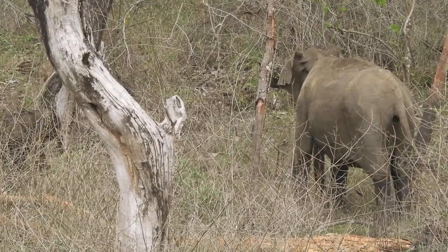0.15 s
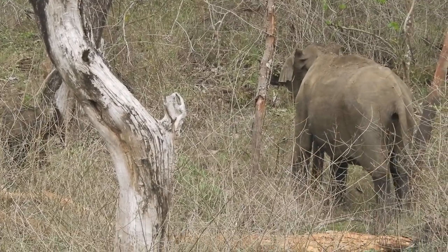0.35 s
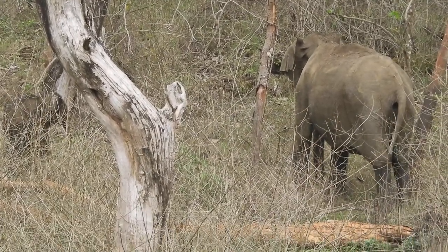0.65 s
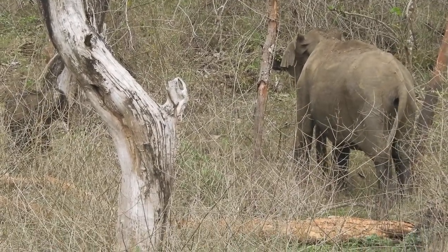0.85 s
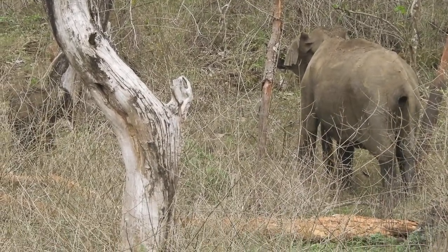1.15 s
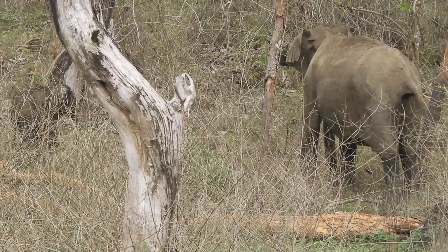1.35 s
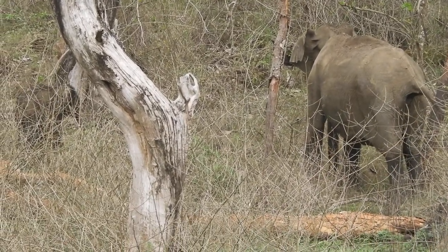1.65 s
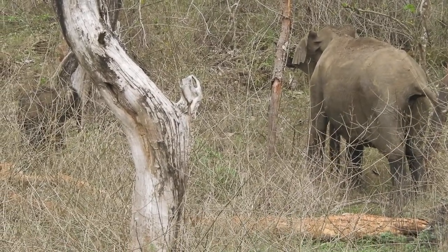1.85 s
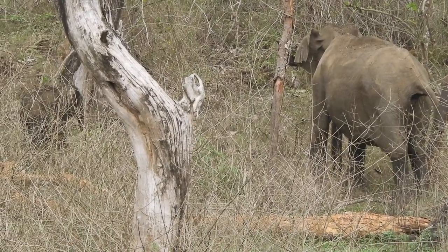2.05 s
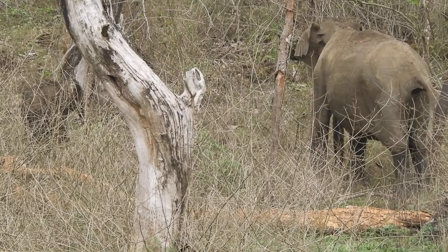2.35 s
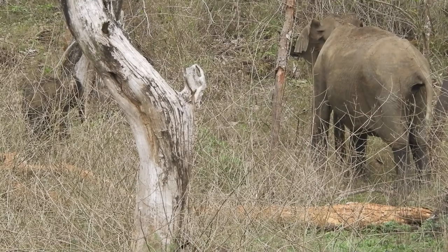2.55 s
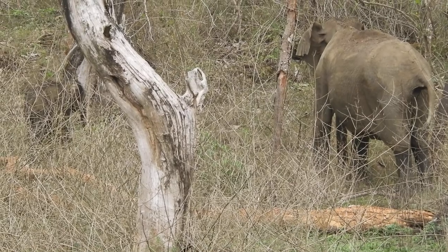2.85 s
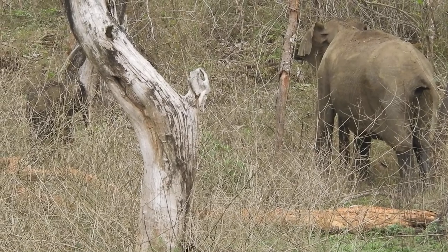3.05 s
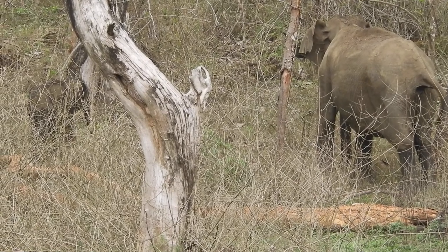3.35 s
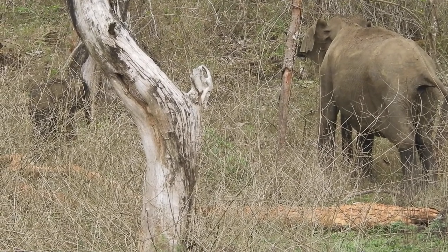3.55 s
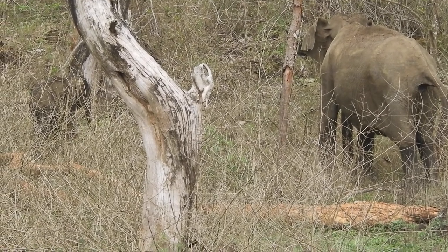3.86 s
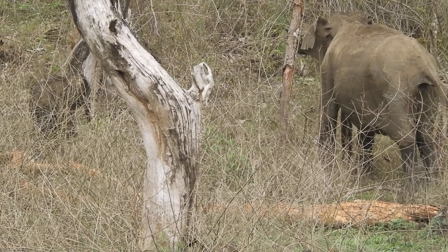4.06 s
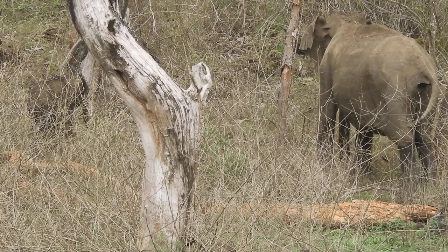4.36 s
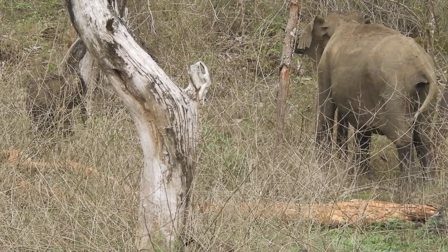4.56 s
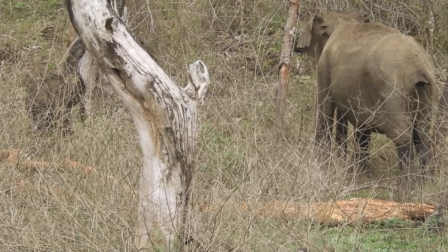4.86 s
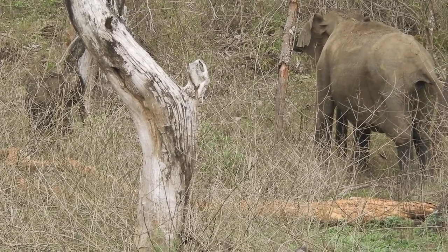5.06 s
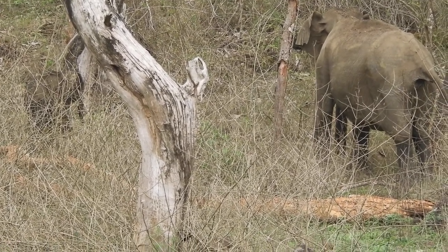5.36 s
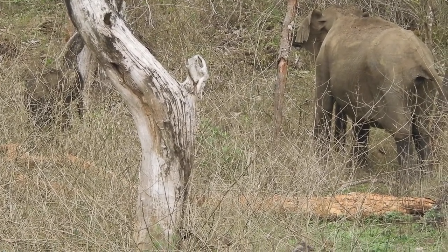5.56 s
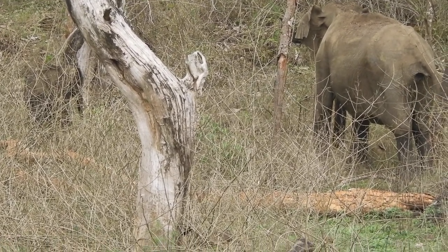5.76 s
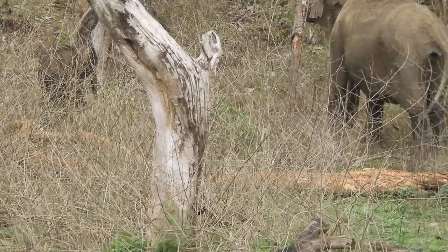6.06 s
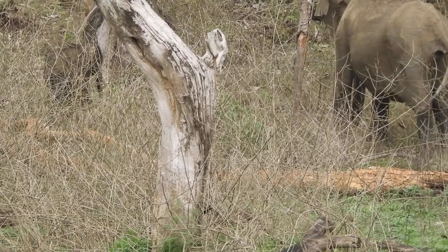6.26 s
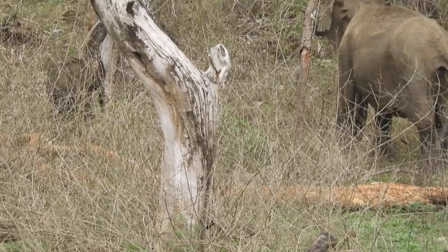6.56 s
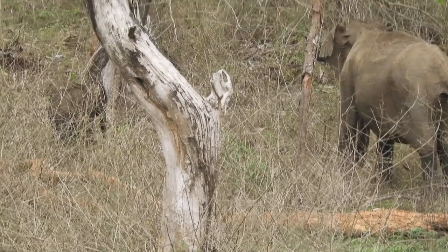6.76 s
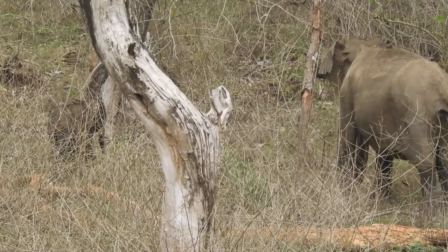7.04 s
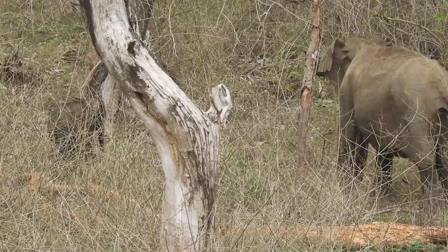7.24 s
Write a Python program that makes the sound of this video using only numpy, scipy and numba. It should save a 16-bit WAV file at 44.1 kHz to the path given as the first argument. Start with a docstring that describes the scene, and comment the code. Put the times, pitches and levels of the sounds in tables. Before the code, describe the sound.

A deep throaty elephant rumble, slightly left, falls and dies away among dry scrub. Low wind thuds hit an unprotected stereo microphone throughout the first half, while insects buzz thin and high and foliage hisses softly. Small dry ticks and brushing leaves come and go. Distant whistling birds echo off trees after the rumble weakens. Heavy wind blasts then overload the microphone and the level dips; finally quieter air, insects and small wooden-sounding creaks.

```python
"""A falling elephant rumble, a sum of overtones shaped by resonances, dies away in dry bush in a gusty breeze.
From the start cicadas and crickets (modulated noise bands), hissing leaves (filtered noise) and wind (eddy
noise and pressure pulses on two microphone ports) sound too; ticks and rustles (noise bursts) soon follow.
Far birds (gliding tones with echoes) call from 2.2 s to 4.2 s. After 5 s the wind is strongest, and overloads
make the gain control duck. From 6.6 s a faint creak is heard: stick-slip pulses ringing a small body."""
import sys
import numpy as np
from scipy import signal
from scipy.io import wavfile
from scipy.ndimage import uniform_filter1d
from numba import njit

SR = 44100
rng = np.random.default_rng(int(sys.argv[2]) if len(sys.argv) > 2 else 0)


def field_ratio(decibels):
    """Amplitude ratio for a level in dB (20 dB per decade); scalars and array-likes work."""
    return 10 ** (np.asarray(decibels, dtype=float) / 20)


def master(y):
    """Save y as 16-bit WAV."""
    cut = np.clip(np.atleast_2d(y).T, -1, 1)
    pcm = np.round(cut * 32767)  # scale
    wavfile.write(sys.argv[1], SR, pcm.astype(np.int16))


N = 326340
T = np.arange(N) / SR  # time in seconds


def curve(rows):
    """Linear interpolation: the columns of a table joined by straight lines in time."""
    s, *columns = np.transpose(rows)
    return [np.interp(T, s, c) for c in columns]


def level(x, db):
    """Normalization by mean power: sets the rms level."""
    return x * field_ratio(db) / np.sqrt(np.mean(x ** 2))


def band(x, hz, width_hz):
    """Resonance: a second-order peak applied twice for steep sides, gain 1 at the centre."""
    b, a = signal.iirpeak(hz, hz / width_hz, fs=SR)
    return signal.lfilter(b, a, signal.lfilter(b, a, x))


def walk(rate, size=N):
    """Slow random fluctuation: levels held 1 / rate s and slewed twice; spread near 1."""
    hold = int(SR / rate)
    steps = np.repeat(rng.standard_normal(size // hold + 1), hold)
    return 1.4 * uniform_filter1d(uniform_filter1d(steps, hold), hold)[:size]


def hump(length, edge=0.11, size=16384):
    """Amplitude envelope with sine-squared ends, on a short buffer; edge is a share of the length."""
    u = T[:size] / length
    return np.sin(np.pi / 2 * np.clip(np.minimum(u, 1 - u) / edge, 0, 1)) ** 2


def spread(x, pan_db=0.):
    """Level-difference stereo: left exceeds right by pan_db."""
    return x * field_ratio(np.array([[pan_db], [-pan_db]]) / 2)


def add(out, s, x):
    """Superposition: mixes a short sound in at time s."""
    i = int(s * SR)
    out[..., i:i + x.shape[-1]] += x[..., :N - i]


@njit
def lowpass(x, hz, damp):
    """State-variable low-pass: two integrators in a loop, whose edge moves every sample."""
    y, b, l = np.empty(len(x)), 0., 0.
    for i in range(len(x)):
        g = np.tan(np.pi * hz[i] / SR)
        v = (b + g * (x[i] - l)) / (1 + g * (g + damp))
        y[i] = l + g * v
        b, l = 2 * v - b, l + 2 * g * v
    return y


def elephant():
    """Source-filter voice: each overtone swells as the falling pitch carries it through a resonance."""
    # Vocal fold rate. Each row: time in seconds, rate in Hz.
    folds = [(0, 25.6), (.6, 25.2), (1.2, 24.2), (1.8, 22.9), (2.4, 21.2), (3.0, 19.2), (3.6, 17.1),
             (4.3, 15.2)]
    # Vocal effort. Each row: time in seconds, tone gain in dB.
    effort = [(0, -26), (.3, -32), (.7, -28.5), (1.8, -30.5), (2.1, -36.5), (2.4, -34), (3.3, -42),
              (3.9, -56), (4.3, -80)]
    # Throat and trunk resonances. Each row: centre in Hz, width in Hz, gain in dB.
    tract = [(46.3, 16, -13), (122.9, 20.5, 3.5), (169.6, 14, -14.5), (200, 5.8, -28)]
    # High resonances excited by breath. Each row: centre in Hz, width in Hz, relative level in dB.
    breath_bands = [(832, 41, -29), (1075, 67, -24.5)]
    (hz,), (effort_db,) = curve(folds), curve(effort)
    phase = np.cumsum(hz * (1 + .003 * walk(6))) / SR  # in fold cycles
    tone = 0
    for k in range(1, 10):
        gain = sum(field_ratio(db) / (1 + (2 * (k * hz - f) / w) ** 2) ** 1.15 for f, w, db in tract)
        # the echo off the ground cancels a narrow band
        gain = gain * (1 - .9 / (1 + ((k * hz - 149) / 7.0) ** 2))
        overtone = np.sqrt(2) * np.sin(2 * np.pi * k * phase)
        tone = tone + gain * field_ratio(0.47 * walk(8.77)) * overtone
    # one puff of noise a fold cycle
    puff = (0.34 + np.exp(-(phase % 1) / 0.2)) * rng.standard_normal(N)
    breath = sum(level(band(puff, f, w), db) * field_ratio(2.4 * walk(8.03)) for f, w, db in breath_bands)
    # breath noise fades more slowly than the tone
    return spread(tone * field_ratio(effort_db) + breath * field_ratio(0.66 * effort_db - 13.5), 4.0)


def pressure(port):
    """Addition of powers: gusts rise, hold and fall over a wavering breeze; gives one port's level in dB."""
    # Light air between the gusts. Each row: time in seconds, left level in dB, right level in dB.
    breeze = [(0, -30, -30), (1.2, -34, -43), (2.4, -36, -40), (3.7, -48.5, -48.5), (4.7, -41.5, -46),
              (5.1, -24, -39), (6.1, -23.5, -28), (6.45, -40.5, -44), (7.4, -48.5, -46.5)]
    # Gusts. Each row: start of full strength in seconds, hold in seconds, level in dB,
    # port (0 left, 1 right).
    gusts = [(0, 0.14, -18, 0), (.03, .01, -14.5, 1), (.1, 0.025, -13, 1), (0.209, 0.016, -14, 0),
             (0.225, 0.0091, -18, 1), (0.286, 0.12, -24, 0), (0.447, 0.043, -20.5, 0), (.5, .04, -28, 1),
             (0.764, 0.034, -16, 0), (0.892, 0.15, -21, 0), (0.967, 0.07, -16.5, 1), (1.152, 0.12, -33, 1),
             (1.223, 0.033, -20.5, 0), (1.457, 0.11, -16, 0), (1.5, .03, -30, 1), (1.592, .1, -25, 0),
             (1.698, .2, -31, 1), (1.755, 0.31, -21.5, 0), (2.316, 0.041, -16.5, 0), (2.411, 0.028, -24, 0),
             (2.778, 0.043, -27.5, 0), (3.013, 0.026, -30.5, 0), (3.64, .01, -30.5, 0),
             (3.716, 0.007, -26, 0), (4.225, 0.21, -24, 0), (4.471, 0.037, -17, 0), (4.86, 0.025, -19.5, 0),
             (4.867, .07, -20.5, 1), (4.967, 0.025, -12, 1), (5.073, 0.087, -11.5, 0),
             (5.106, .07, -23.5, 1), (5.246, .32, -10.5, 0), (5.27, .12, -17.5, 1), (5.434, .16, -17.5, 1),
             (5.634, 0.099, -23, 0), (5.74, 0.018, -21, 1), (5.818, 0.039, -8.5, 0), (5.829, 0.016, -15, 1),
             (5.882, .06, -13, 0), (5.91, 0.022, -18.5, 1), (5.986, 0.054, -10.5, 0),
             (6.099, .19, -10.5, 0), (6.099, .12, -16.5, 1), (6.358, .04, -29, 0), (6.578, 0.084, -19.5, 0),
             (6.624, 0.061, -25, 1), (6.835, 0.019, -25, 0), (6.85, 0.018, -29, 1), (7.11, 0.0089, -29, 0),
             (7.135, 0.0087, -31, 1), (7.24, 0.025, -25, 1), (7.246, .01, -33, 0)]
    rise_db_per_s, fall_db_per_s = 450, 385
    power = field_ratio(2 * (curve(breeze)[port] + 2.3 * walk(7)))
    for s, hold, db, side in gusts:
        if round(side) == port:
            near = slice(max(int((s - .15) * SR), 0), int((s + hold + .15) * SR))
            late = T[near] - s
            below_db = rise_db_per_s * np.maximum(-late, 0)
            below_db = below_db + fall_db_per_s * np.maximum(late - hold, 0)
            power[near] += field_ratio(2 * (db - below_db))
    return 10 * np.log10(power)


def wind(db, slope=0.2):
    """Turbulence on one port: faster air and harder gusts push the eddy noise higher."""
    # Upper edge of the eddy noise in a middling gust, set by air speed. Each row: time in seconds, edge in Hz.
    eddy = [(0, 149), (1.2, 125), (1.6, 166), (2.4, 130), (4.3, 119), (5.15, 126), (5.47, 240), (5.65, 140),
            (5.83, 189), (6, 135), (6.22, 163), (6.5, 125), (7.4, 115)]
    gust_db = uniform_filter1d(db, size=1500) + 21.5  # above or below a middling gust
    top_hz = curve(eddy)[0] * field_ratio(slope * gust_db + 1.36 * walk(6))
    x = rng.standard_normal(N) * field_ratio(4.07 * walk(45))
    for _ in range(2):
        x = lowpass(x, top_hz, 1.21)
    # the smallest eddies leave a faint rough skirt above the edge
    x = lowpass(x, top_hz, 1.4) + field_ratio(-6.5) * x
    x = signal.sosfilt(signal.butter(3, 66, "high", fs=SR, output="sos"), x)
    running_rms = np.sqrt(uniform_filter1d(x ** 2, size=2500))
    return x * field_ratio(db) / running_rms


def buffets():
    """Pressure pulses: a damped swing about a crest; only the strongest have a marked sharp snap there."""
    # Single buffets. Each row: crest in seconds, level of the swing before the high-pass in dB,
    # time scale in milliseconds, port (0 left, 1 right).
    pulses = [(.22, -12.5, 1.04, 0), (.457, -12, 1.28, 0), (0.764, -14, 1.12, 0), (1.549, -9.5, 1.18, 0),
              (4.986, -4, 2.1, 1), (5.33, -6, 2.2, 0), (5.458, -8, .65, 0), (5.503, -9, .6, 0),
              (5.836, -9, 0.65, 0), (.1125, -1.5, 1.4, 1), (5.125, 1.5, 1.6, 0), (5.433, 6, 1.5, 0)]
    out = np.zeros((2, N))
    for s, db, ms, port in pulses:
        u = np.abs(T[:4096] - T[2048]) / (ms / 1000)
        swing = field_ratio(db) * np.exp(-(u / 2.2) ** 2) * np.cos(1.3 * u)
        snap = field_ratio(4 * min(db, -1.5) - 7) * np.exp(-u / .15)
        add(out[int(round(port))], s - T[2048], swing + snap)
    return signal.sosfilt(signal.butter(1, 45, "high", fs=SR, output="sos"), out)


def insects():
    """Amplitude modulation: cicadas buzz at their click rate near 9 kHz, crickets throb unevenly near 5 kHz."""
    # the cicada chorus swells and sinks
    chorus_mean_db, swell_db, period_s, crest_s = -47.5, 1.9, 1.468, 1.47
    chorus_db = chorus_mean_db + swell_db * np.cos(2 * np.pi * (T - crest_s) / period_s)
    click_hz = 133 * (1 + 0.0131 * walk(3.3))
    buzz = 1 + 0.17 * np.sin(2 * np.pi * np.cumsum(click_hz) / SR)
    # one noise is common to both ports, the others separate
    cicadas = band(buzz * rng.standard_normal((3, N)), 8987, 930)
    cicadas = level(cicadas[1:] + 0.15 * cicadas[0], 0)
    cicadas = cicadas * field_ratio(chorus_db + 0.56 * walk(8) + 0.77 * walk(1.445))
    throb_hz = 4.9 * (1 + 0.115 * walk(2.11))
    throb = field_ratio(1.74 * np.sin(2 * np.pi * np.cumsum(throb_hz) / SR) + 3 * walk(35))
    crickets = band(throb * rng.standard_normal((3, N)), 4815, 1020)
    return cicadas + level(crickets[0] + 1.1 * crickets[1:], -55.5)


def bush():
    """Partly coherent noise: half-octave bands of distant leaves flicker alone, partly alike left and right."""
    # Spectrum of the hiss. Each row: frequency in Hz, relative density in dB per Hz.
    hiss = [(20, -26), (50, -10.5), (110, 6.5), (210, 1), (265, -13), (700, -12.5), (2000, -21),
            (3500, -19.5), (5500, -15), (7000, -13), (10000, -31.5), (11500, -44), (15500, -31.5)]
    # Swell of the hiss. Each row: time in seconds, relative level in dB.
    swell = [(0, -46.5), (1.3, -46), (2.2, -49.5), (4.4, -50), (5, -49), (5.5, -53.5), (6.3, -51),
             (7.4, -50)]
    out, (hz_points, db_points) = 0, np.transpose(hiss)
    shared = walk(9.1)
    for hz in 42 * 2 ** np.arange(0, 8.6, .5):
        mid, side = band(rng.standard_normal((2, N)), hz, hz / 2)
        db = np.interp(np.log(hz), np.log(hz_points), db_points) + 1.6 * shared + 2.02 * walk(10)
        # the ports differ more toward the treble
        side = np.clip(hz / 12000, .68, 1) * side * np.array([[1], [-1]])
        out = out + field_ratio(db) * (mid + side)
    return spread(level(out, 0) * field_ratio(curve(swell)[0] + 4.0), 2.0)


def undergrowth():
    """Impact and friction noise: decaying twig ticks and brushed leaves over a soft random crackle."""
    # Twig ticks. Each row: start in seconds, peak before panning and dulling in dB, centre in Hz,
    # left minus right in dB.
    ticks = [(0.18, -34, 5400, .5), (.794, -36, 8000, -.5), (1.098, -34.5, 8000, 0),
             (1.169, -31.5, 6600, 0), (1.934, -30, 5470, 6), (2.188, -39, 1500, 6), (2.718, -38.5, 1780, 7),
             (3.229, -38.5, 1300, 6), (4.003, -39.5, 1600, 4), (5.379, -42, 6000, 5),
             (6.698, -30.5, 6030, 3)]
    # Leaves brushed. Each row: middle in seconds, length in seconds, centre in Hz,
    # rms level before shaping and dulling in dB.
    rustles = [(0.26, 0.1, 400, -46), (0.416, 0.23, 3500, -50.5), (0.477, 0.085, 740, -45),
               (0.703, 0.13, 1060, -51.5), (1.309, 0.16, 8700, -39), (1.47, .1, 430, -44),
               (1.857, 0.25, 497, -55.5), (4.682, 0.1, 2000, -55.5), (5.096, 0.13, 5360, -41.5),
               (6.585, .08, 9500, -50), (6.662, 0.14, 920, -55.5), (7.001, 0.21, 980, -53.5),
               (7.263, 0.08, 6500, -47), (7.342, 0.13, 935, -53)]
    width_share, widest_hz = 1.28, 5600  # rustle width as a share of the centre, and its limit
    out = np.zeros((2, N))
    for s, db, hz, pan_db in ticks:
        tick = band(rng.standard_normal(2048) * np.exp(-T[:2048] / 0.0095), hz, 1.24 * hz)
        add(out, s, spread(tick * field_ratio(db) / np.abs(tick).max(), pan_db))
    for s, length, hz, db in rustles:
        shape = hump(length, edge=0.42)
        grain = rng.standard_normal((3, len(shape))) * field_ratio(1.8 * walk(57.5, size=len(shape)))
        rustle = band(grain[0] + 0.85 * grain[1:], hz, min(width_share * hz, widest_hz))
        add(out, s - length / 2, level(rustle, db) * shape)
    crackle = rng.standard_normal(N) * field_ratio(3.5 * walk(12) + 3.5 * walk(70))
    out = out + spread(level(band(crackle, 1170, 3900), -65), 5.2)
    # the ticks and rustles are dulled above 10 kHz
    return signal.sosfilt(signal.butter(6, 10300, fs=SR, output="sos"), out)


def birds():
    """Reverberation: slightly hoarse gliding tones are smeared by echoes from the trees."""
    # Far bird notes. Each row: start in seconds, length in seconds, start pitch in Hz, end pitch in Hz,
    # relative level in dB.
    notes = [(2.226, 0.069, 5200, 4140, -55.5), (2.297, 0.14, 4050, 4030, -58),
             (2.466, 0.051, 1662, 1658, -49.5), (2.508, 0.13, 4040, 3900, -60),
             (2.648, 0.19, 3420, 3286, -60), (2.878, 0.098, 2314, 1730, -55.5),
             (2.968, 0.16, 1652, 1627, -64), (2.92, 0.19, 4180, 4000, -63.5),
             (3.176, .14, 3810, 3604, -59.5), (3.25, 0.046, 1905, 2300, -59),
             (3.279, 0.146, 2296, 2326, -59.5), (3.415, 0.16, 3640, 3330, -65.5),
             (3.459, 0.017, 1360, 1260, -54), (3.689, 0.16, 4060, 3700, -56.5),
             (3.938, 0.072, 3304, 2680, -54), (4.034, 0.21, 2870, 3134, -65), (4.05, .1, 3310, 3500, -62),
             (2.968, .08, 4150, 3700, -62), (3.06, .1, 2310, 2290, -62)]
    out = np.zeros(N)
    for s, length, hz0, hz1, db in notes:
        shape = hump(length)
        hz = hz0 + (hz1 - hz0) * np.clip(T[:len(shape)] / length, 0, 1)
        hz = hz * (1 + .012 * walk(250, size=len(shape)))  # hoarseness
        shape = shape * field_ratio(3 * walk(48.7, size=len(shape)))
        add(out, s, np.sqrt(2) * field_ratio(db) * shape * np.sin(2 * np.pi * np.cumsum(hz) / SR))
    t = T[:12000]
    # echoes fall by 60 dB in 0.41 s
    echoes = rng.standard_normal((2, len(t))) * np.exp(-np.log(1000) * t / 0.41)
    echoes /= np.sqrt(np.sum(echoes ** 2, axis=1, keepdims=True))
    return field_ratio(-2) * out + field_ratio(3) * signal.fftconvolve(out[None], echoes, axes=1)[:, :N]


def creaks():
    """Stick-slip friction: uneven slip pulses ring the resonances of a small body."""
    # Creaks. Each row: start in seconds, length in seconds, mean slips per second,
    # rms level before shaping in dB.
    slip_runs = [(6.625, 0.09, 190, -56), (6.808, 0.029, 200, -49), (6.921, 0.15, 200, -49.5),
                 (7.293, 0.063, 175, -54.5)]
    # Resonances of the body. Each row: centre in Hz, width in Hz, relative gain in dB.
    body = [(937, 210, 1), (1224, 160, -8), (1530, 620, -12), (1880, 89, -14)]
    out = np.zeros(N)
    for s, length, rate, db in slip_runs:
        shape = hump(length)
        slip_count = np.floor(np.cumsum(rate * (1 + 0.053 * walk(40, size=len(shape)))) / SR)
        slips = np.diff(slip_count, prepend=0) * field_ratio(4.1 * walk(71.6, size=len(shape)))
        ring = sum(field_ratio(g) * band(slips, f, w) / np.sqrt(w) for f, w, g in body)
        add(out, s, level(ring, db) * shape)
    return out


def scene():
    """Superposition of all sources at the two ports."""
    gusts = np.array([wind(pressure(port=0)), wind(pressure(port=1))]) + buffets()
    return elephant() + gusts + insects() + birds() + undergrowth() + creaks() + bush()


@njit
def duck(peak, top, depth_db, fall, recover_db):
    """Feedback gain in dB: an overload after the gain lowers its aim, the gain slides there, the aim climbs."""
    out, aim, db = np.empty(len(peak)), 0., 0.
    for i in range(len(peak)):
        overload = peak[i] * 10 ** (db / 20) > top
        aim = -depth_db if overload else min(aim + recover_db, 0.)
        db += (aim - db) * fall
        out[i] = db
    return out


def low_pass(x):
    """Removes everything above the highest recorded frequency."""
    return signal.sosfilt(signal.butter(12, 15630, fs=SR, output="sos"), x)


def record(dry):
    """Limited dynamic range: gain control ducks after overloads, then hard clipping."""
    peak = np.abs(dry).max(axis=0)  # the louder port steers both
    # the gain slides with a 0.07 s time constant; its aim climbs 7.5 dB per second
    gain_db = duck(peak, top=1.5, depth_db=10, fall=1 / (.07 * SR), recover_db=7.5 / SR)
    mix = np.clip(dry * field_ratio(gain_db), -1, 1)
    return low_pass(mix)


dry = scene()
out = record(dry)
master(out)
```